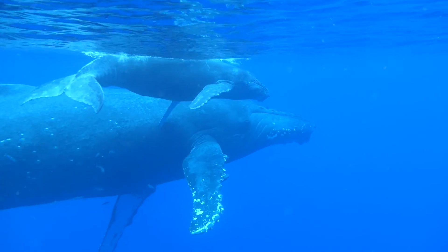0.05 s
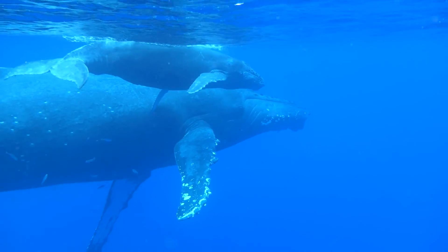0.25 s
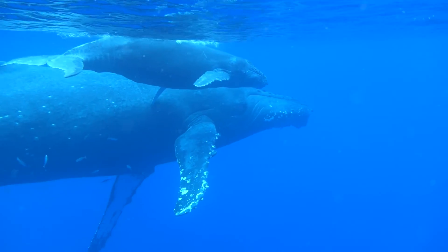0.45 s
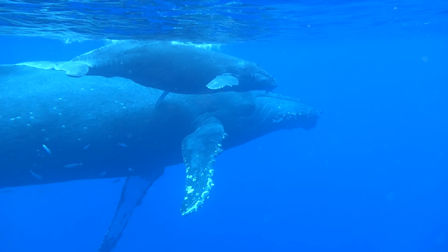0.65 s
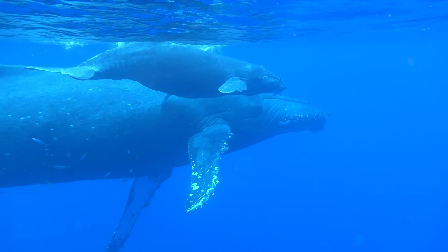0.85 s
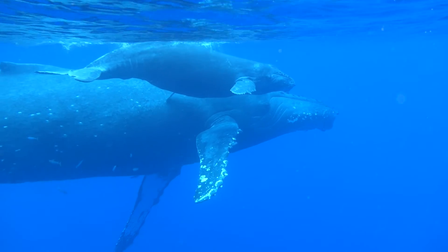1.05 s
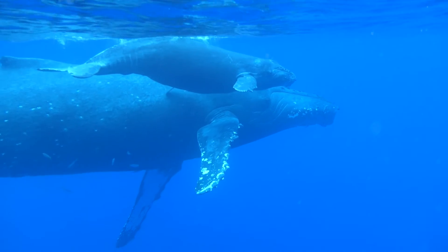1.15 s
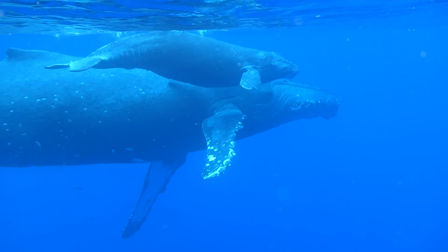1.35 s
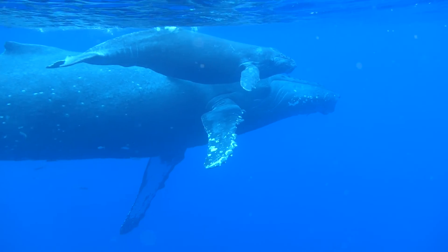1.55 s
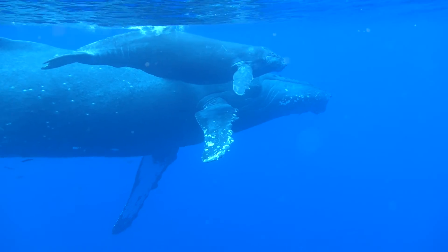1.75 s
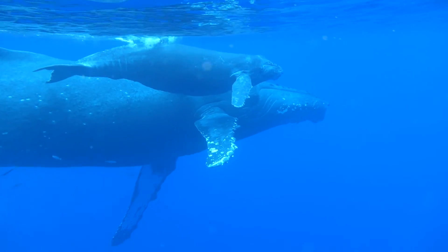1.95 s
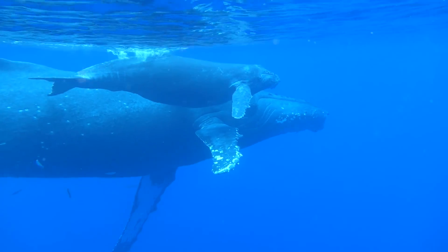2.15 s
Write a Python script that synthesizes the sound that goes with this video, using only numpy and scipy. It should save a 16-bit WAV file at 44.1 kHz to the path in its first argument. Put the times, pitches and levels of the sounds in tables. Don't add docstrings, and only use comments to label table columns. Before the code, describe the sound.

A humpback whale call climbs from a rough growl to a clean whistle over murky underwater roar

```python
import sys
import numpy as np
from scipy import signal
from scipy.fft import rfft, irfft
from scipy.io import wavfile
from scipy.ndimage import uniform_filter1d

SR = 44100
rng = np.random.default_rng(int(sys.argv[2]) if len(sys.argv) > 2 else 0)


def to_wav(s):
    ch = np.atleast_2d(s).T
    pcm = np.round(np.clip(ch, -1, 1) * 32767)
    wavfile.write(sys.argv[1], SR, pcm.astype(np.int16))


def gain_from_db(level_db):
    decades = np.asarray(level_db, float) / 20
    return 10 ** decades


N = 97020

# center in Hz, width in Hz, left level in dB,
# right level in dB, right lag in radians.
HOUSING_RINGS = [(382.4, 134, -6.5, -5.5, -0.1), (531, 129, -3.5, 3.5, 1.26), (670, 157, -1.5, -2, 1.03),
                 (1007.3, 81, 1, -6.5, 0.9), (1143, 301, -8, -7.5, 1.14), (1490, 55, -15.5, -12, 1),
                 (1816, 257, -20.5, -19.5, 2), (2070, 690, -37, -32, 5.5), (2440, 210, -25.5, -27, -4),
                 (2702, 273, -30, -31.5, -5.5), (3120, 142, -46, -44, 5), (3570, 67, -35, -30, 1.24),
                 (5300, 137, -39, -47.5, -1)]
CASE_CUT_HZ = 143
# time in seconds, level in dB.
SURGE = [(0, -47), (0.101, -44.5), (0.156, -60), (0.19, -41), (.26, -46.5), (1.161, -48.5), (1.243, -43),
         (1.312, -49), (1.36, -40), (1.461, -52.5), (1.509, -48), (1.7, -49), (1.745, -47.5), (1.775, -47),
         (1.921, -50), (1.961, -60.5), (1.998, -47), (2.07, -47)]
# frequency in Hz, share from 0 to 1.
SURGE_SHARE = [(200, 0.43), (600, 0.65), (1100, 0.94), (2200, 0.13), (4000, 0.53)]
# frequency in Hz, spread in dB.
SEA_PATCHES = [(300, 1.8), (1000, 1.63), (1600, 2), (3000, 6)]
# frequency in Hz, correlation from 0 to 1.
SEA_SAME = [(300, 0.45), (600, 0.38), (1000, 0.54), (1400, 0.76), (2500, 0.41)]
SEA_DB, SEA_FLICKER_DB = -36.5, 1.5
# return in seconds, depth from 0 to 1, drain in seconds.
LULLS = [
    (.184, 0.5, 0.024),
    (1.74, 0.9, 0.011),
    (1.76, 0.87, 0.0075),
    (1.989, 0.5, 0.0093),
]
# frequency in Hz, density in dB per Hz.
RUMBLE = [(20, -18.5), (60, -13.5), (150, -1.5), (250, 0), (400, -30.5)]
RUMBLE_DB, RUMBLE_SAME = -56.5, -0.74
# frequency in Hz, density in dB per Hz.
HISS = [(2000, -33), (3000, -7), (4500, -5.5), (5500, -6.5), (7000, -2), (10000, -8.5), (13000, -15.5),
        (15600, -24)]
# frequency in Hz, left-right difference in dB.
HISS_PAN = [(3000, -0.5), (5000, -2.5), (7400, 1), (9000, 2), (15000, 4.5)]
HISS_DB, HISS_SAME, HISS_SURGE_SHARE = -64, 0.48, 0.15

# start in seconds, peak in dB, pitch in Hz, left-right difference in dB.
SNAPS = [(0.219, -53, 6860, 2.5), (.3536, -48, 8770, -3), (0.4504, -54, 5170, -1), (0.6362, -40.5, 8940, 3),
         (0.667, -46, 5780, -1.5), (.677, -57, 12000, 2), (.69, -49, 9300, -2), (.693, -51, 7000, -1),
         (.696, -49, 5170, -3), (.699, -55, 10500, 4), (.702, -52.5, 7800, -0.5),
         (0.706, -47.5, 4500, -4.5), (.787, -58, 9130, -1.5), (.9028, -51.5, 9450, 2.5),
         (.916, -52, 8000, 0.5), (.917, -50.5, 4300, -2), (1.0088, -51, 7560, -0.5),
         (1.07, -53.5, 7580, 2.5), (1.0892, -51, 5610, 3.5), (1.5082, -54.5, 7840, 1.5),
         (1.5919, -43, 9980, 5.5), (1.592, -54, 13500, -0.5), (1.7544, -51, 8770, 0.5),
         (1.755, -54.5, 13000, -1), (.636, -53, 12000, 1.5), (1.05, -54, 6800, 0.5), (1.06, -53, 4300, 1),
         (1.8596, -51, 7680, -2), (1.892, -52, 7620, 4), (1.9488, -55.5, 5300, 2.5),
         (1.95, -52.5, 9500, 4.5), (2.0207, -51, 7740, 8), (2.1063, -48, 6920, -1), (2.159, -57, 6840, 0)]
CRACKLE_PER_S, CRACKLE_DB, CRACKLE_SPREAD_DB = 120, -67, 2.5

# time in seconds, pitch in Hz, fundamental in dB, overtones in dB,
# left-right difference in dB.
CALL = [(.23, 165.1, -55.5, -55.5, -13), (.31, 198, -39.5, -44, -3.5), (.35, 221, -35.5, -37.5, -5),
        (.388, 238, -28.5, -34.5, -4), (.42, 280, -30, -33, -3.5), (0.47, 306, -26.5, -38.5, -4.5),
        (0.504, 321, -24.5, -36.5, -3.5), (0.609, 329, -28.5, -35.5, -3.5), (.66, 355.9, -22, -37.5, -4),
        (.694, 402, -16, -31.5, -5), (.725, 465, -20, -29.5, -3.5), (.782, 600, -23.5, -32, -5.5),
        (.82, 624, -24, -27.5, -5.5), (.952, 700, -19, -31.5, -1), (.966, 772, -30.5, -20.5, -5),
        (1.01, 845, -31.5, -28.5, -11), (1.034, 950, -34.5, -19, -9), (1.068, 1000, -33, -47, 10)]
# center in seconds, half width in seconds.
FADES = [(.265, 0.0028), (.295, 0.0035), (.327, 0.017), (0.394, 0.0042), (.458, 0.019), (0.631, 0.01),
         (0.659, 0.0058), (0.685, 0.0054), (0.701, 0.0037), (0.714, 0.0066), (0.739, 0.0028),
         (0.755, 0.0019), (0.771, 0.0051), (0.915, 0.0076), (.965, 0.0079), (.975, 0.0016), (.987, 0.0031),
         (1.012, 0.0037), (1.028, 0.0027), (1.061, 0.002)]
# delay in seconds, left level in dB, right level in dB.
ECHOES = [
    (.021, -17, -17),
    (.037, -19, -20),
    (.06, -23, -22),
    (.095, -27, -27),
]
# center in Hz, width in Hz, left level in dB,
# right level in dB, right lag in radians.
VOICE_RINGS = [(447, 64, -5, -4, -1.1), (705, 260, -13, -15, -1), (1156, 270, -9, -6, 2.15),
               (1405, 150, -14.5, -3.5, 1.06), (1648, 167, -23, -7.5, -0.4), (1820, 110, -24, -31.5, 4),
               (2177, 230, -15.5, -14.5, 2.5), (2499, 154, -10.5, -5.5, -0.15),
               (2810, 160, -29, -29.5, 0.5), (3006, 177, -20, -12, -1.5), (3600, 130, -23, -19, 1.7),
               (4200, 330, -40, -38.5, 0.5), (5300, 450, -19.5, -17, 1)]
FADE_LEAK, PITCH_JITTER = 0.17, 0.002
GROWL_HZ, GROWL_DB, BREATH_DB = 260, 7.5, -7
TILT_DB, DULLING, BREAKUP_DB = 1.0, 1.1, 2.1
GLIDE_LOSS_DB = 1.5
SECOND_LOSS_DB = 11
PLATEAU_LOSS_DB = 7
SHEEN_HZ, SHEEN_LOSS_DB, TOP_HZ, TOP_LOSS_DB = 2800, 11, 4400, 12

# peak in dB, pitch in Hz, length in
# seconds.
PINGS = [(-27.5, 2580, 0.0052), (-26, 375, 0.011), (-26, 560, 0.0035), (-37.5, 250, 0.019),
         (-13, 455.4, 0.019), (-26.5, 440, .03), (-30.5, 700, .025), (-47, 2530, 0.005), (-50, 2420, 0.017),
         (-36.5, 1500, 0.016), (-28.5, 362, 0.024), (-27, 472, 0.032), (-33, 383, 0.033),
         (-35.5, 455, 0.026), (-37, 323, 0.011), (-37, 620, 0.022), (-40, 1050, 0.015), (-36, 1030, .025),
         (-34, 540, 0.018), (-36.5, 1500, .02), (-39, 1650, 0.016)]
PING_TIMES_S = [.7015, .241, .296, 1.056, .7415, .772, .962, 1.79, 1.815, 2.0, .69, .386, .318, .345, 1.068,
                1.905, 1.9, 1.995, 2.015, .362, .364]


def smooth(x, size, axis=-1):
    return uniform_filter1d(x, size=size, axis=axis)


def unit_rms(x):
    return x / np.sqrt(np.mean(abs(x) ** 2) + 1e-20)


def read(points, hz):
    f, value = np.transpose(points)
    return np.interp(np.log(hz + 1), np.log(f + 1), value)


def sides(pan_db):
    return gain_from_db(np.array([pan_db, -pan_db]) / 2)


def add(mix, start_s, sound):
    part = mix[:, round(start_s * SR):][:, :sound.shape[1]]
    part += sound[:, :part.shape[1]]


def housing(hz, rings=HOUSING_RINGS):
    f, width, left_db, right_db, lag = np.transpose(rings)
    bell = 1 / (1 + (2 * (hz[:, None] - f) / width) ** 2) ** 2
    size = np.sqrt([bell @ gain_from_db(2 * left_db), bell @ gain_from_db(2 * right_db)])
    low_cut = 1 + (CASE_CUT_HZ / (hz + 1)) ** 2
    return size / low_cut * np.exp(1j * np.outer([0, 1], np.interp(hz, f, lag)))


def water_noise(color, same, patch_db, flicker_db, surge_share):
    frames = N // 128 + 5
    a, b, c, d, patches = rng.standard_normal((frames, 257, 5)).T
    patches = unit_rms(smooth(smooth(patches, 4, axis=0), 14, axis=1))
    flicker = unit_rms(smooth(rng.standard_normal(frames), 6))
    surge_db = np.interp(np.arange(frames) * 128 / SR, *np.transpose(SURGE))
    surge_db = np.outer(surge_share * np.ones(257), surge_db - surge_db.mean())
    left = a + 1j * b
    right = same * left + np.sqrt(1 - same ** 2) * (c + 1j * d)
    spectra = np.array([left, right]) * gain_from_db(patch_db * patches + flicker_db * flicker + surge_db)
    x = signal.istft(spectra, nperseg=512, noverlap=384)[1][:, :N]
    return unit_rms(irfft(rfft(x) * color(np.fft.rfftfreq(N, 1 / SR)), N))


def lulls():
    t = np.arange(N) / SR
    drains = [1 - depth * np.exp(-abs(t - at) / drain) * (t < at) for at, depth, drain in LULLS]
    return smooth(np.prod(drains, axis=0), 60)


def rumble_color(hz):
    return gain_from_db(read(RUMBLE, hz) - 45 * (hz > 420))


def hiss_color(hz):
    return gain_from_db(read(HISS, hz)) * sides(read(HISS_PAN, hz)) * (hz > 200)


def sea():
    hz = np.fft.rfftfreq(512, 1 / SR)
    same = read(SEA_SAME, hz)[:, None]
    patch_db = read(SEA_PATCHES, hz)[:, None]
    roar = water_noise(housing, same, patch_db, SEA_FLICKER_DB, read(SURGE_SHARE, hz))
    rumble = water_noise(rumble_color, RUMBLE_SAME, 3.1, 1.2, 0.06)
    hiss = water_noise(hiss_color, HISS_SAME, 2.6, 0.81, HISS_SURGE_SHARE)
    return gain_from_db(SEA_DB) * roar * lulls() + gain_from_db(RUMBLE_DB) * rumble + gain_from_db(HISS_DB) * hiss


def snap(db, hz, pan_db):
    t = np.arange(200) / SR
    tick = np.sin(2 * np.pi * hz * t) * (t / 0.00044) * np.exp(1 - t / 0.00037)
    rebound = 0.45 * np.roll(tick, 42)
    fizz = smooth(rng.standard_normal((2, 200)), 8) * np.cos(2 * np.pi * hz * t)
    return gain_from_db(db) * sides(pan_db)[:, None] * (tick + rebound + 1.3 * fizz * np.exp(-t / 0.0047))


def shrimp():
    out = np.zeros((2, N))
    for start_s, db, hz, pan_db in SNAPS:
        add(out, start_s, snap(db, hz, pan_db))
    for at, size, pitch, pan in rng.random((round(CRACKLE_PER_S * N / SR), 4)):
        db = CRACKLE_DB - CRACKLE_SPREAD_DB * np.log(1 - 0.97 * size)
        add(out, at * N / SR, snap(db, 4500 + 7000 * pitch, 6 * pan - 1.5))
    return out


def overtones(hz, turns):
    glide = smooth(abs(np.gradient(np.log2(hz))) * SR, 800)
    drift = unit_rms(smooth(smooth(rng.standard_normal((34, N // 200 + 2)), 5), 4))
    drift = smooth(np.repeat(drift, 200, axis=1)[:, :N], 200)
    k = np.arange(2, 36)[:, None]
    last_climb = np.clip(hz / 100 - 5.8, 0, 1)
    on_plateau = np.clip(3 - abs(hz - 325) / 12, 0, 1)
    off_sheen = np.clip(abs(hz - 315) / 40 - 0.6, 0, 1)
    off_top = np.clip(abs(hz - 318) / 15 - 0.6, 0, 1)
    db = BREAKUP_DB * drift - TILT_DB * k * (hz / 320) ** DULLING
    db -= GLIDE_LOSS_DB * glide * ((k > 2) | (hz > 300))
    db -= SECOND_LOSS_DB * (k == 2) * last_climb
    db -= PLATEAU_LOSS_DB * (k < 6) * on_plateau
    db -= SHEEN_LOSS_DB * (k * hz > SHEEN_HZ) * off_sheen
    db -= TOP_LOSS_DB * (k * hz > TOP_HZ) * off_top
    return (gain_from_db(db) * np.cos(2 * np.pi * k * turns) * (k * hz < 7000)).sum(0)


def growl(hz, turns):
    gain = gain_from_db(BREATH_DB) + gain_from_db(GROWL_DB) / (1 + (hz / GROWL_HZ) ** 8)
    pulse = 0.2 + np.exp(-(turns % 1) / 0.28)
    return gain * pulse * 2 * smooth(rng.standard_normal(N), 8)


def path_fades(t):
    nulls = [np.tanh((t - at) / half) + 1j * FADE_LEAK / np.cosh((t - at) / half) for at, half in FADES]
    return np.prod(nulls, axis=0)


def whale():
    t = np.arange(N) / SR
    s, *columns = np.transpose(CALL)
    hz, db, over_db, pan_db = (smooth(np.interp(t, s, c), 700) for c in columns)
    on = smooth(1.0 * (t > s[0]) * (t < s[-1]), 600)
    jitter = PITCH_JITTER * unit_rms(smooth(rng.standard_normal(N), 300))
    turns = np.cumsum(hz * (1 + jitter)) / SR
    wave = (path_fades(t) * np.exp(2j * np.pi * turns)).real
    tone = np.sqrt(2) * on * gain_from_db(db) * wave * sides(pan_db)
    voice = on * gain_from_db(over_db) * (overtones(hz, turns) + growl(hz, turns))
    cased = irfft(rfft(voice) * housing(np.fft.rfftfreq(N, 1 / SR), VOICE_RINGS), N)
    direct = tone + cased * gain_from_db(12)
    out = direct.copy()
    for delay_s, left_db, right_db in ECHOES:
        add(out, delay_s, direct * gain_from_db([[left_db], [right_db]]))
    return out


def pings():
    out = np.zeros((2, N))
    for start_s, (db, hz, length_s) in zip(PING_TIMES_S, PINGS):
        u = np.arange(0, 2 * length_s, 1 / SR) / length_s
        envelope = ((u / 0.46) * np.exp(1 - u / 0.4)) ** 2
        ring = envelope * np.sin(2 * np.pi * hz * length_s * u)
        add(out, start_s, gain_from_db(db) * sides(-5.5)[:, None] * ring)
    return out


def scene():
    return sea() + shrimp() + whale() + pings()


def top_cut(x):
    return signal.sosfilt(signal.butter(12, 15700, fs=SR, output="sos"), x)


def record(dry):
    return top_cut(dry)


dry = scene()
out = record(dry)
to_wav(out)
```